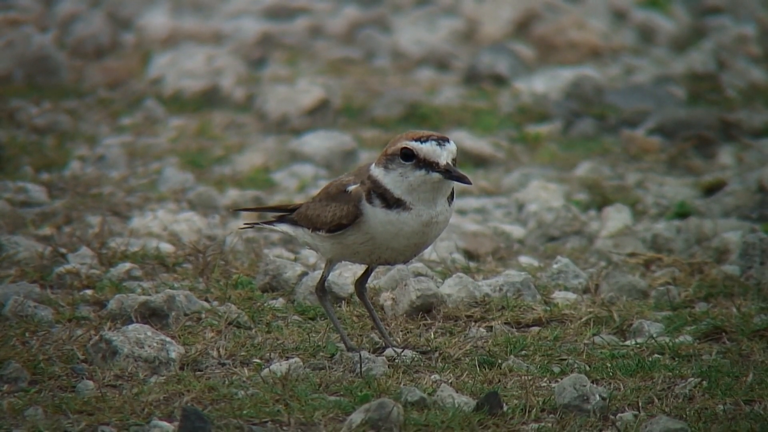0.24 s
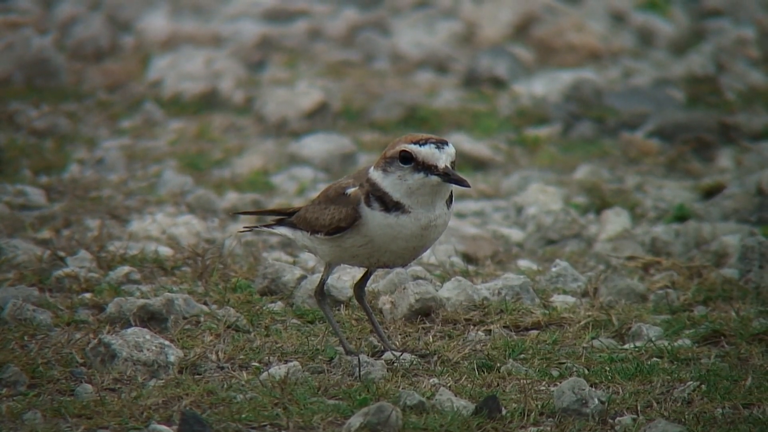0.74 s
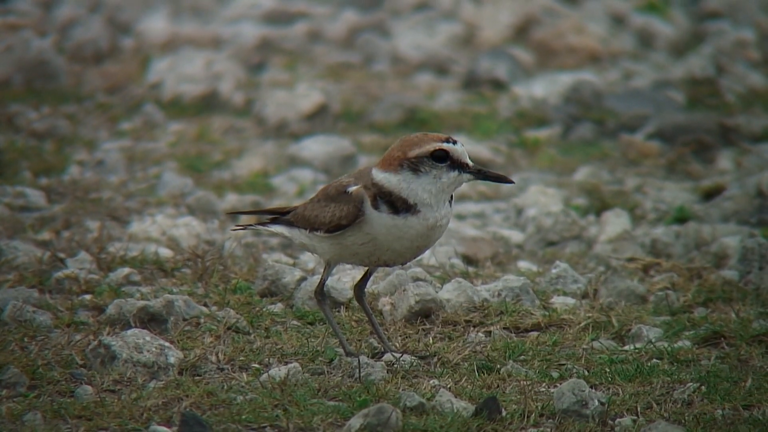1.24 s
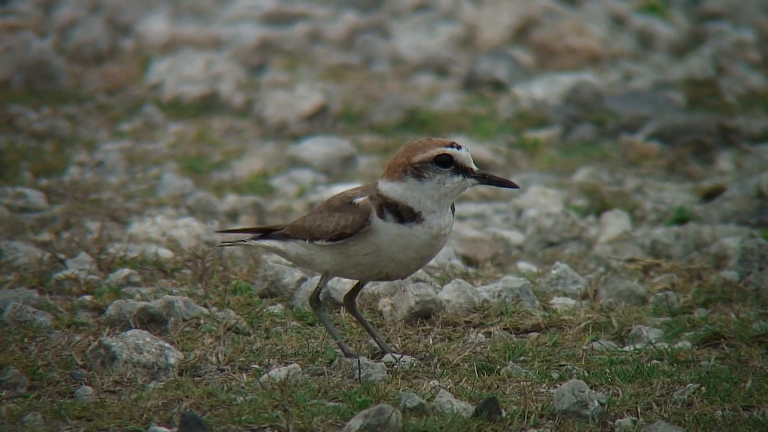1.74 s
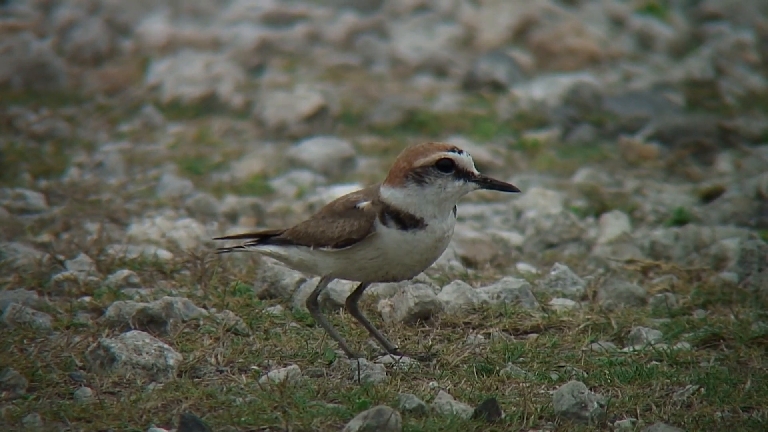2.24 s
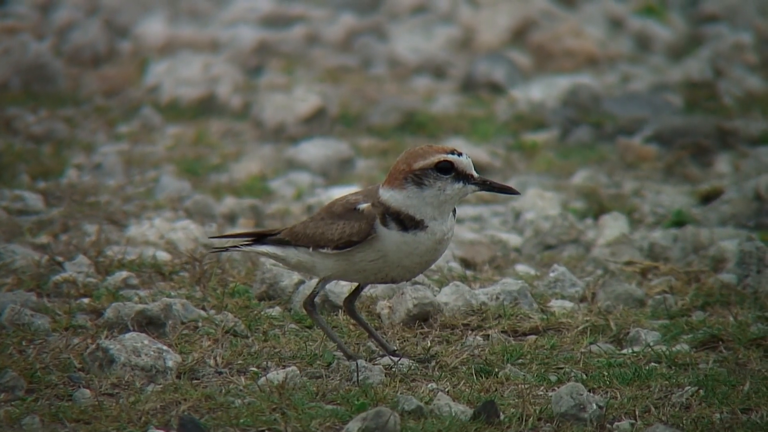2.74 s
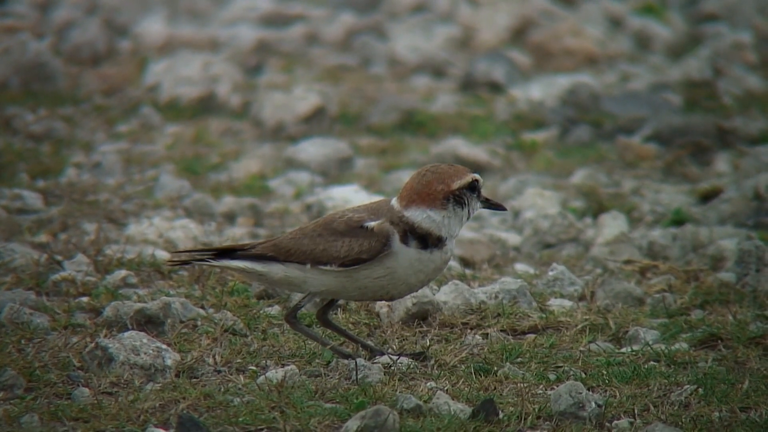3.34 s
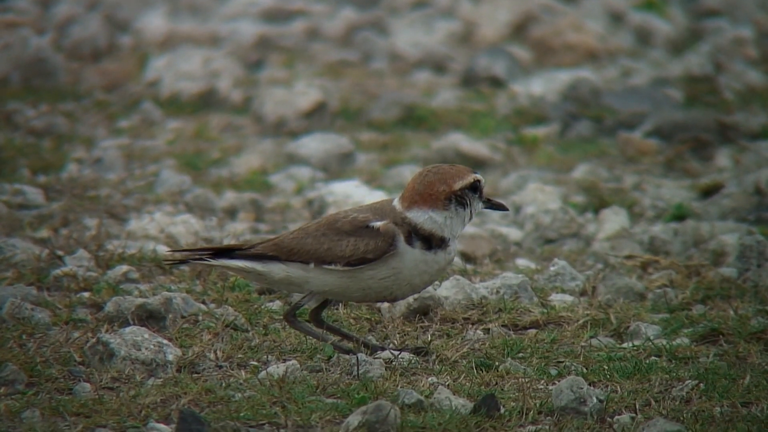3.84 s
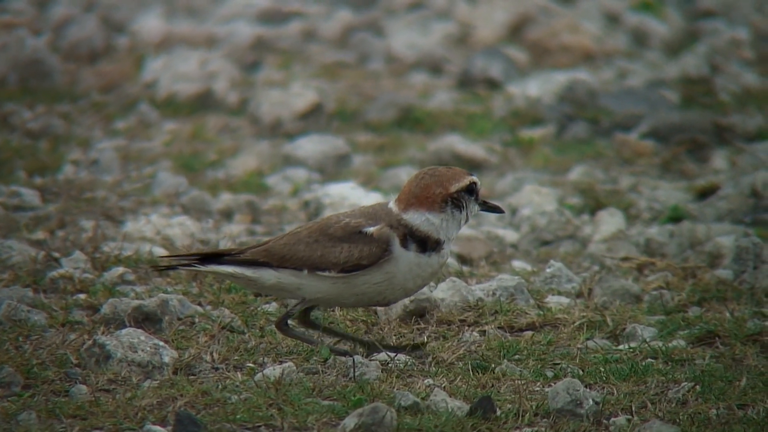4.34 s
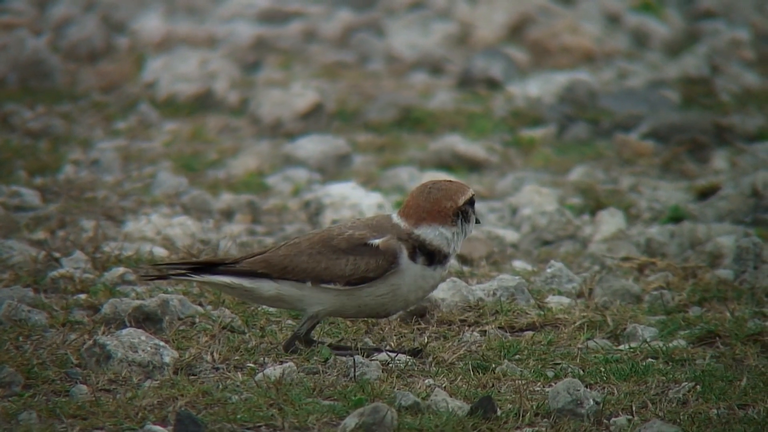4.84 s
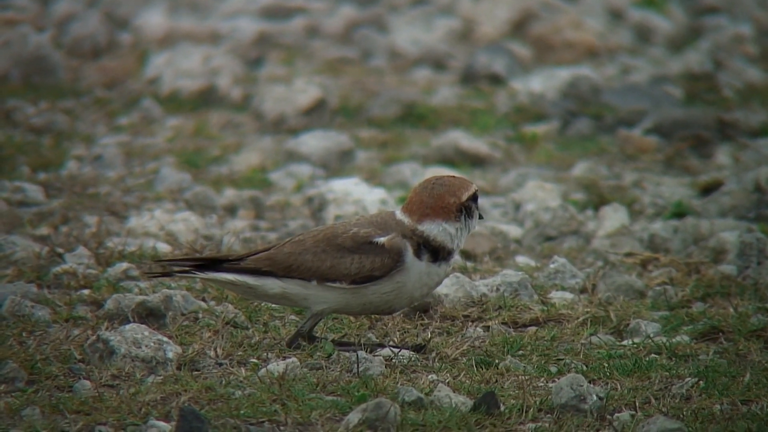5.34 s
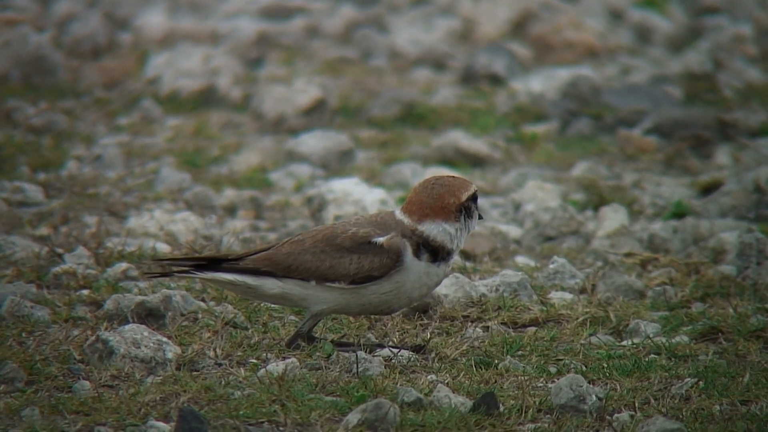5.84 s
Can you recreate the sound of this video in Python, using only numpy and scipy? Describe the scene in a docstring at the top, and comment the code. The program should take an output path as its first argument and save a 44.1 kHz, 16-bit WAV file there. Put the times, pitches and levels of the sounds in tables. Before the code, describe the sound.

Thin, patchy treble hiss runs from the start, with almost no low end. From about 0.2 seconds a small plover, close and centred, pipes very short, pure whistles around 4 kHz, each lifting quickly in pitch, about three per second. They are modest at first, uneven in strength, and grow clearly louder after 3.4 seconds. Faint, brief far whistles slide between them, and at 2.2 seconds a nearby bird gives one sharp, lower arched chip. From 3.8 to 4.7 seconds distant shorebirds add rising slurs that snap down, grainy with scattered echoes, overlapping the piping. The strongest peep, near 4.75, is chopped off at 4.78 with a tiny click. After a blink of silence, a duller, soft outdoor wash enters at 4.81, leaning a little left; one modest chip sounds at 5.2 with a faint tail, and the wash eases down to the end at about six seconds.

```python
"""Over a thin hiss a plover on stony ground pipes a rising note about three times a second, growing louder.
Far whistles slide between its notes, a near bird chips once, and later far shorebirds slur upward.
All breaks off in mid-note; after a blink of silence comes a duller outdoor wash with one more chip.
Calls are gliding sine tones, the far ones broken up by scattered echoes; hiss and wash are coloured noise."""
import sys
import numpy as np
from scipy import signal
from scipy.io import wavfile
from scipy.ndimage import uniform_filter1d

SR = 44100
rng = np.random.default_rng(int(sys.argv[2]) if len(sys.argv) > 2 else 0)


def inscribe(sig):
    """Save sig as 16-bit PCM at rate SR to the path in sys.argv[1].

    A 1-D sig is mono; a 2-D sig holds one channel per row.
    Samples are clipped to [-1, 1] before scaling.
    """
    pcm = np.round(np.clip(np.atleast_2d(sig).T, -1, 1) * 32767)
    wavfile.write(sys.argv[1], SR, pcm.astype(np.int16))


N = 268877
TIME = np.arange(N) / SR


def gain_of(db):
    """Decibels to amplitude."""
    return 10 ** (np.asarray(db) / 20)


def evened(x):
    """Scales to rms 1."""
    return x / np.sqrt(np.mean(x ** 2) + 1e-20)


def read_at(points, hz):
    """Reads a table of frequencies and values on a log-frequency axis."""
    table_hz, value = np.transpose(points)
    return np.interp(np.log(hz + 1), np.log(table_hz + 1), value)


def follow(points):
    """Reads a table of times and values at every sample."""
    return np.interp(TIME, *np.transpose(points))


def add(mix, start_s, sound):
    """Adds a sound into the mix at a time, cut short at the end of the mix."""
    part = mix[round(start_s * SR):][:len(sound)]
    part += sound[:len(part)]


def span(before_s, after_s):
    """Seconds from a note's top, and the place in the note: -1 start, 0 top, 1 end."""
    t = np.arange(-before_s, after_s, 1 / SR)
    return t, t / np.where(t < 0, before_s, after_s)


def wander(t, rate_hz):
    """Smooth chance of rms 1: sixteen sines of random frequency, none faster than the rate."""
    share, phase = rng.random((2, 16, 1))
    sines = np.sin(2 * np.pi * (rate_hz * share * t + phase))
    return sines.sum(0) / np.sqrt(8)


def whistle(t, hz, db, waver, flutter_db):
    """A nearly pure tone on curves of pitch and level; waver is a share of the pitch."""
    unsteady_hz = hz * (1 + waver * wander(t, 250))
    phase = 2 * np.pi * np.cumsum(unsteady_hz) / SR
    level = gain_of(db + flutter_db * wander(t, 110))
    soft_ends = signal.windows.tukey(len(t), .15)
    return np.sqrt(2) * np.sin(phase) * level * soft_ends


def scatter(x, delay_s, t60_s, width):
    """Many faint, decaying echoes off stones and plants, arriving mostly from the front."""
    t = np.arange(SR) / SR
    taps = rng.standard_normal((2, SR)) * (rng.random((2, SR)) < .1)  # one sample in ten echoes
    taps *= gain_of(-60 * t / t60_s) * (t > delay_s)
    taps /= np.linalg.norm(taps, axis=1)[:, None]
    mid, side = signal.fftconvolve(x[None], taps, axes=1)[:, :N]
    return np.array([mid + width * side, mid - width * side])


def air(spectrum, peaks, likeness, patchy_db, balance=((1000, 0),)):
    """Stereo noise of rms 1 with a broad colour, a few narrow humps and drifting patches."""
    hz = np.fft.rfftfreq(1024, 1 / SR)
    a, b, c, d, patches = rng.standard_normal((N // 256 + 5, 513, 5)).T
    # smooth the patches over frequency, then over time
    patches = uniform_filter1d(patches, size=8, axis=0)
    patches = evened(uniform_filter1d(patches, size=6, axis=1))
    # the right ear shares part of the left ear's noise
    same = np.clip(read_at(likeness, hz), -1, 1)[:, None]
    left = a + 1j * b
    right = same * left + np.sqrt(1 - same ** 2) * (c + 1j * d)
    humps_db = sum(db / (1 + (2 * (hz - f) / w) ** 2) for f, w, db in peaks)
    colour_db = read_at(spectrum, hz) + humps_db
    ears_db = colour_db + np.outer([.5, -.5], read_at(balance, hz))
    bins = np.array([left, right]) * gain_of(ears_db[:, :, None] + patchy_db * patches)
    return evened(signal.istft(bins, nperseg=1024, noverlap=768)[1][:, :N])


# colour of the hiss, of which only the shape counts: (frequency [Hz], density [dB per Hz])
HISS_COLOUR = [(120, -95.5), (200, -60), (320, -51), (748, -41.5), (880, -38.5), (1720, -32.5),
               (3120, -19.5), (3470, -18), (4010, -11), (4240, -2.5), (5360, -11), (6300, -4), (7020, -11),
               (11000, -12.5), (15000, -15)]
# narrow humps in that colour: (frequency [Hz], width [Hz], height [dB])
HISS_HUMPS = [(4170, 470, 0), (6372, 350, 7.5)]
# how alike left and right are: (frequency [Hz], likeness [0-1])
HISS_LIKENESS = [(60, 0.37), (180, 0.42), (550, 0.77), (1650, 1.0), (4970, 0.83), (15000, 0.28)]
# level of the hiss's treble: (time [s], level [dB])
HISS_TREBLE_LEVEL = [(0.0, -62.5), (0.11, -63), (0.2, -60), (0.24, -61.5), (0.93, -59.5), (2.14, -61),
                     (2.2, -54), (2.28, -62), (2.43, -53.5), (2.6, -61), (4.34, -59.5), (4.37, -54.5),
                     (4.58, -60.5), (4.66, -57), (4.69, -45), (4.77, -52.5)]
HISS_ABOVE_TREBLE_DB = 8.5  # the whole hiss against its treble


def hiss():
    """Thin, patchy noise that swells now and then."""
    noise = air(HISS_COLOUR, HISS_HUMPS, HISS_LIKENESS, patchy_db=2.4)
    return noise * gain_of(HISS_ABOVE_TREBLE_DB + follow(HISS_TREBLE_LEVEL))


# colour of the wash, of which only the shape counts: (frequency [Hz], density [dB per Hz])
WASH_COLOUR = [(180, -82), (300, -55.5), (571, -47.5), (738, -39), (1570, -18), (1910, -12.5),
               (2470, -14.5), (3040, -6), (4470, -10.5), (4920, -13), (7010, -18), (7600, -31.5),
               (8500, -23.5), (10100, -28.5), (14000, -31)]
# narrow humps in that colour: (frequency [Hz], width [Hz], height [dB])
WASH_HUMPS = [(1957, 370, 5.5), (8050, 1600, 9.5)]
# how alike left and right are: (frequency [Hz], likeness [0-1])
WASH_LIKENESS = [(60, 0.079), (240, 0.52), (950, 0.43), (3770, 0.65), (15000, 0.92)]
# lean to one side: (frequency [Hz], left minus right [dB])
WASH_BALANCE = [(60, -5), (240, -1), (950, 3.5), (3770, 6), (15000, -1.5)]
# level of the wash: (time [s], level [dB])
WASH_SWELL = [(4.88, -52), (5.1, -53), (5.23, -51.5), (5.5, -53.5), (5.68, -56), (6.1, -56)]


def wash():
    """Duller noise whose middle and lower treble lean left."""
    noise = air(WASH_COLOUR, WASH_HUMPS, WASH_LIKENESS, patchy_db=2.5, balance=WASH_BALANCE)
    return noise * gain_of(follow(WASH_SWELL))


# far whistles: (start [s], length [s], first pitch [Hz], last pitch [Hz], level [dB],
# share that arrives scattered [0-1])
FAR_WHISTLES = [(.25, 0.066, 4200, 4900, -50, 0.3), (1.416, 0.059, 2805, 3094, -52, 0.18),
                (2.04, 0.081, 2660, 3160, -40.5, 0.01), (2.92, .076, 5240, 6130, -34, 0.87),
                (3.391, .095, 3224, 3876, -47.5, 1), (3.671, 0.083, 5610, 5005, -41.5, 0.17),
                (4.164, .11, 3270, 3287, -58, 0), (4.602, 0.089, 3020, 3150, -48, 0.42)]
WHISTLE_EASE, WHISTLE_EDGE_DB = 2.8, -24.5  # how soon the pitch settles; both ends against the middle


def whistles():
    """Each far whistle slides to its last pitch and settles there; returns direct and scattered parts."""
    direct, scattered = np.zeros((2, N))
    for start, length, first_hz, last_hz, db, share in FAR_WHISTLES:
        t, place = span(length / 2, length / 2)
        still_to_go = abs((1 - place) / 2) ** WHISTLE_EASE
        pitch = last_hz + (first_hz - last_hz) * still_to_go
        level = db + WHISTLE_EDGE_DB * place ** 2
        note = whistle(t, pitch, level, waver=.01, flutter_db=2.5)
        add(direct, start, np.sqrt(1 - share) * note)
        add(scattered, start, np.sqrt(share) * note)
    return direct, scattered


# far birds' rising slurs: (time of the top [s], top pitch [Hz], level [dB], rise [s], fall [s])
RISING_SLURS = [(3.835, 5430, -29.5, .118, .026), (4.142, 5440, -31.5, 0.079, 0.022),
                (4.416, 5337, -32, 0.096, 0.027), (4.676, 5496, -22.5, 0.086, 0.027)]
SLUR_START, SLUR_END, SLUR_BEND = .59, .39, 1.4  # first and last pitch as shares of the top; bend of the climb
SLUR_START_DB, SLUR_END_DB = -28.5, -30.5  # ends against the top
SLUR_ROUNDNESS, SLUR_SNAP = 1.27, .5  # swell: 1 = pointed, 2 = round; share of the fall the drop takes


def slurs():
    """Each slur climbs and swells, then snaps down by more than an octave."""
    voice = np.zeros(N)
    for top_s, hz, db, rise, fall in RISING_SLURS:
        t, place = span(rise, fall)
        below = np.maximum(-place, 0)  # 1 at the start, 0 from the top on
        drop = 1 - np.exp(-(np.maximum(place, 0) / SLUR_SNAP) ** 2)
        pitch = hz * (1 - (1 - SLUR_START) * below ** SLUR_BEND - (1 - SLUR_END) * drop)
        level = db + SLUR_START_DB * below ** SLUR_ROUNDNESS + SLUR_END_DB * drop
        add(voice, top_s - rise, whistle(t, pitch, level, waver=.024, flutter_db=3.5))
    return voice


# harmonics of the near chip, from the first up: (loudest, from the top [s], level [dB], half-length [s])
NEAR_CHIP_HARMONICS = [(-0.000056, -17, 0.0078), (-0.0079, -14, 0.017), (-0.016, -38.5, 0.01)]
# the one harmonic of the chip in the wash: (loudest, from the top [s], level [dB], half-length [s])
WASH_CHIP_HARMONICS = [(-.003, -33, 0.018)]
# each chip: time of its top [s], pitch there [Hz], share the pitch sags 10 ms to either side
NEAR_CHIP_S, NEAR_CHIP_HZ, NEAR_CHIP_SAG = 2.1795, 2340, .085
WASH_CHIP_S, WASH_CHIP_HZ, WASH_CHIP_SAG = 5.183, 3367, .05
CHIP_RISE_S, CHIP_FALL_S = .018, .0188  # a chip sounds this long before and after its top
CHIP_EDGE_DB, CHIP_ROUNDNESS = -17.5, 1.27  # change a half-length from the loudest; 1 = pointed, 2 = round


def chip(top_s, top_hz, sag, harmonics):
    """A quick arch of pitch in which each harmonic swells at its own moment."""
    voice = np.zeros(N)
    t, _ = span(CHIP_RISE_S, CHIP_FALL_S)
    pitch = top_hz * (1 - sag * (t / .01) ** 2)
    for k, (loudest, db, half) in enumerate(harmonics, 1):
        level = db + CHIP_EDGE_DB * abs((t - loudest) / half) ** CHIP_ROUNDNESS
        add(voice, top_s + t[0], whistle(t, k * pitch, level, waver=.004, flutter_db=1))
    return voice


# the plover's notes: (time at the loudest [s], level [dB], pitch there [Hz], glide [Hz per s],
# swell [s], fade [s])
PIPED_NOTES = [(.212, -34, 4230, 2870, 0.049, 0.03), (.551, -32.5, 4286, 6300, 0.045, 0.037),
               (.838, -27.5, 4198, 5440, .034, 0.063), (1.177, -38, 4180, 6500, 0.038, 0.072),
               (1.5, -29.5, 4217, 2500, 0.038, 0.052), (1.811, -25.5, 4260, 7300, 0.048, 0.036),
               (1.978, -38.5, 4224, 3040, .018, 0.0093), (2.133, -23.5, 4150, 4410, 0.035, 0.03),
               (2.458, -29.5, 4176, 5530, 0.042, 0.075), (2.816, -33, 4197, 2490, 0.051, 0.017),
               (3.161, -32.5, 4357, 5430, 0.048, 0.021), (3.473, -25.5, 4217, 3000, 0.013, 0.041),
               (3.795, -25.5, 4107, 3000, .018, 0.016), (3.823, -17.5, 4216, 2500, .016, 0.017),
               (4.152, -23, 4193, 1483, 0.049, 0.012), (4.422, -23.5, 4154, 2850, 0.027, 0.075),
               (4.752, -15.5, 4040, 4640, 0.042, 0.04)]
PIPE_EDGE_DB, PIPE_ROUNDNESS = -26.5, 1.25  # both ends against the top; 1 = pointed top, 2 = round
PIPE_LIFT_HZ = 304  # the glide levels off this far above and below the middle


def piping():
    """Each note swells and fades while its pitch lifts along an S."""
    voice = np.zeros(N)
    for top_s, db, hz, glide, swell, fade in PIPED_NOTES:
        t, place = span(swell, fade)
        pitch = hz + PIPE_LIFT_HZ * np.tanh(glide * t / PIPE_LIFT_HZ)
        level = db + PIPE_EDGE_DB * abs(place) ** PIPE_ROUNDNESS
        add(voice, top_s - swell, whistle(t, pitch, level, waver=.005, flutter_db=2.3))
    return voice


SLUR_SCATTERED = .8  # share of a slur's power that arrives scattered
GROUND_DELAY_S, TAIL_DELAY_S = .012, .052  # first echoes off the ground, and off things further away


def flock():
    """Near birds arrive directly, far ones broken up by scatter; the open ground adds a faint long tail."""
    pipes, slurred = piping(), slurs()
    direct, scattered = whistles()
    near = chip(NEAR_CHIP_S, NEAR_CHIP_HZ, NEAR_CHIP_SAG, NEAR_CHIP_HARMONICS)
    direct = direct + np.sqrt(1 - SLUR_SCATTERED) * slurred
    scattered = scattered + np.sqrt(SLUR_SCATTERED) * slurred
    # paths of nearly equal length interfere and make the far calls grainy
    broken = direct + scatter(scattered, delay_s=.001, t60_s=.09, width=.1)
    smear = gain_of(-6.5) * scatter(scattered, delay_s=.0117, t60_s=.27, width=.15)
    to_ground = gain_of(-13) * pipes + gain_of(-30.5) * near
    ground = scatter(to_ground, delay_s=GROUND_DELAY_S, t60_s=.07, width=.14)
    to_tail = gain_of(-20) * pipes + gain_of(-21.5) * (direct + scattered) + gain_of(-26) * near
    tail = scatter(to_tail, delay_s=TAIL_DELAY_S, t60_s=.88, width=.24)
    return pipes + near + ground + broken + smear + tail


def afterwards():
    """The duller wash and a single arched chip, a little to the left, with a faint tail."""
    bed = wash()
    call = chip(WASH_CHIP_S, WASH_CHIP_HZ, WASH_CHIP_SAG, WASH_CHIP_HARMONICS)
    placed = call * gain_of([[1.5], [-1.5]])
    tail = gain_of(-22.5) * scatter(call, delay_s=.015, t60_s=.85, width=.7)
    return bed + placed + tail


BREAK_S, RESUME_S = 4.7762, 4.81


def scene():
    """Flock and hiss stop dead, which clicks; after a blink of silence the wash begins."""
    before = np.clip((BREAK_S - TIME) / .0001, 0, 1)  # gone within 0.1 ms
    return (flock() + hiss()) * before + afterwards() * (TIME > RESUME_S)


EDGE_HZ = 15100


def record(dry):
    """The recorder's band limit: a steep low-pass that cuts the top of the treble."""
    low_pass = signal.firwin(511, EDGE_HZ, window=("kaiser", 9), fs=SR)
    return signal.oaconvolve(dry, low_pass[None], "same")


dry = scene()
out = record(dry)
inscribe(out)
```